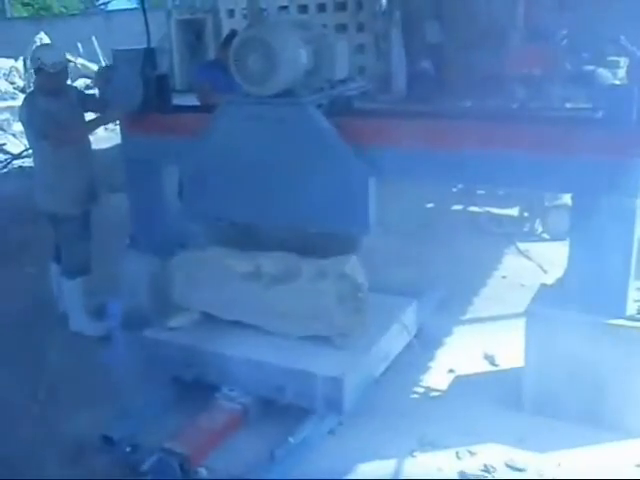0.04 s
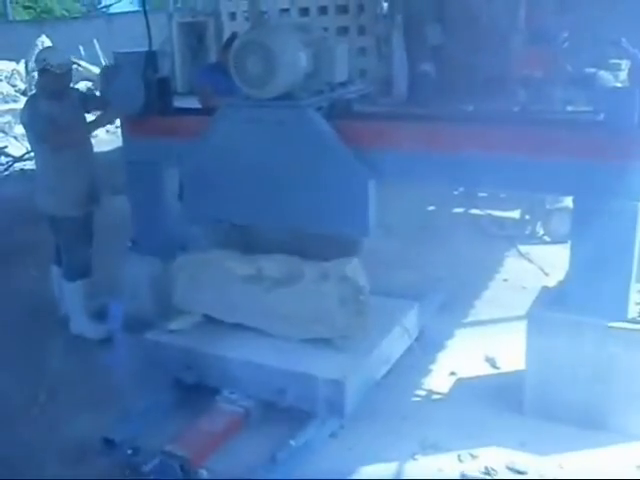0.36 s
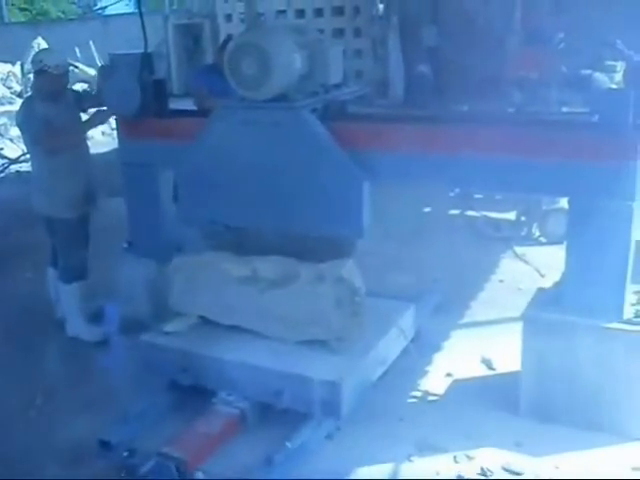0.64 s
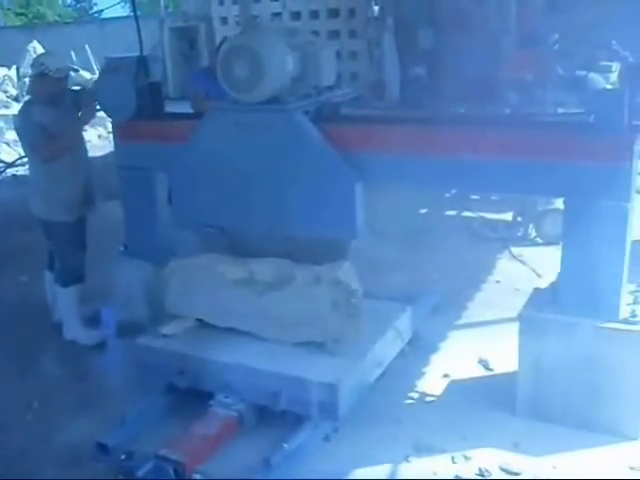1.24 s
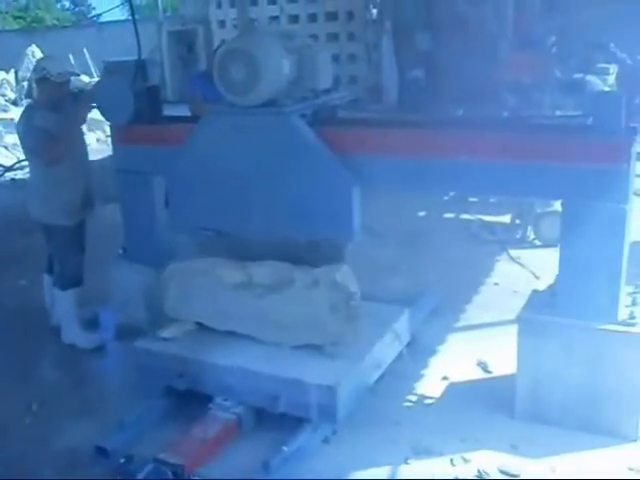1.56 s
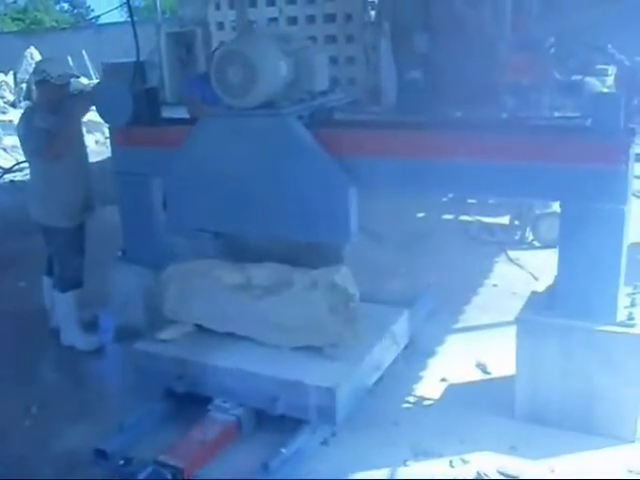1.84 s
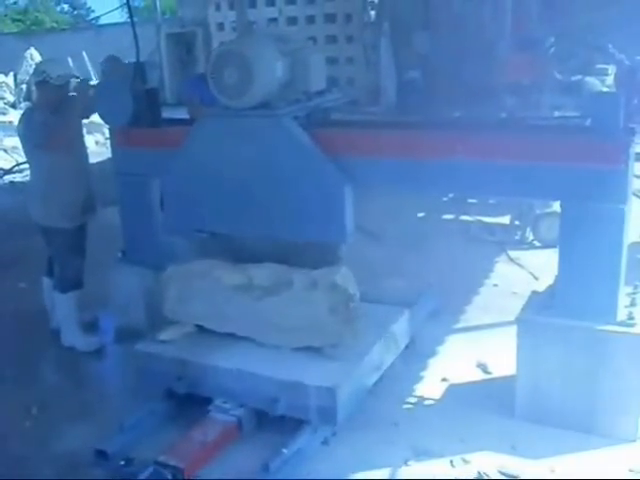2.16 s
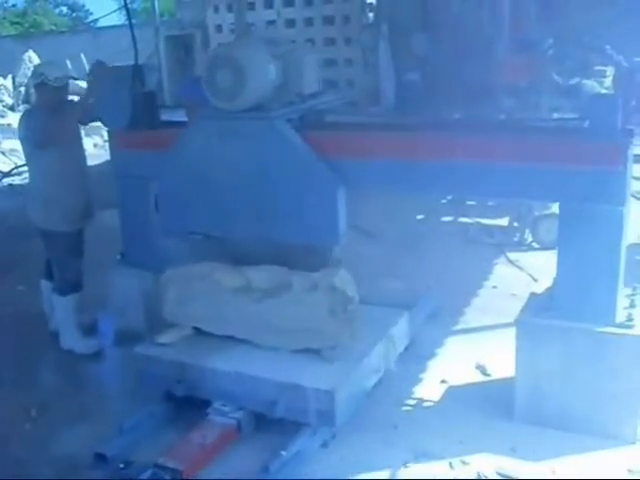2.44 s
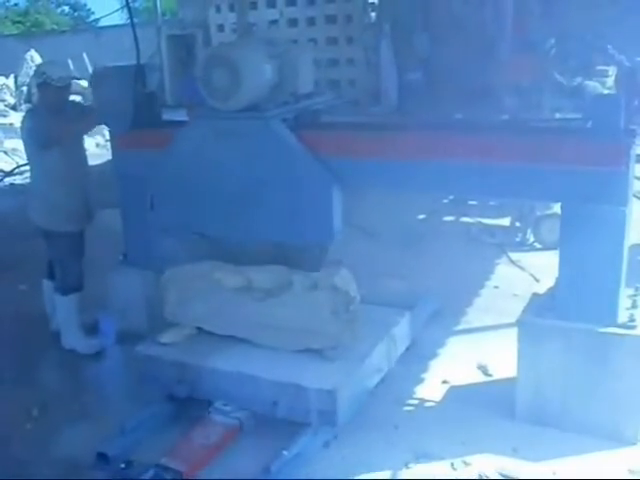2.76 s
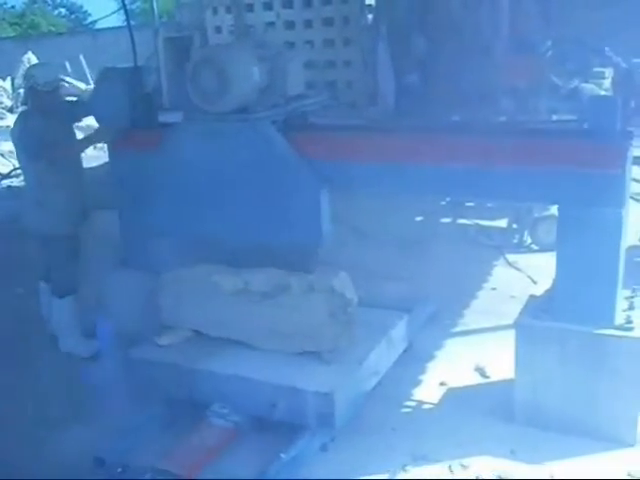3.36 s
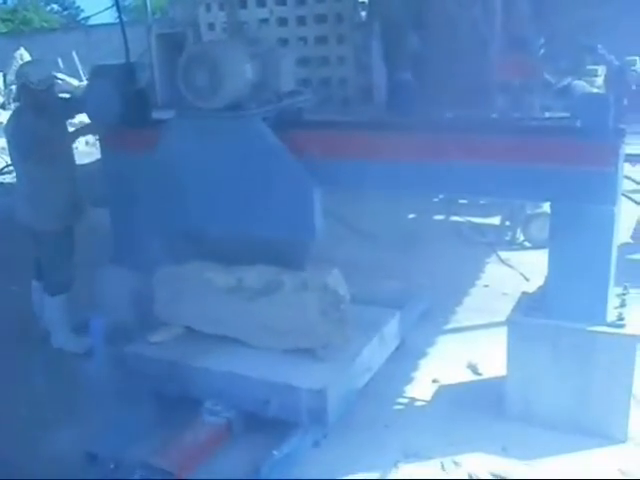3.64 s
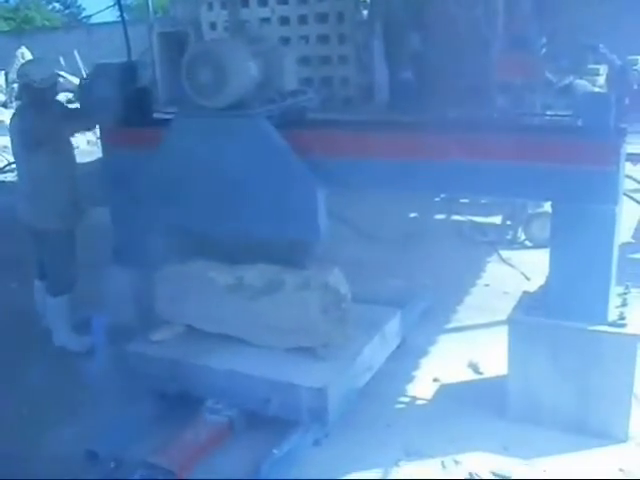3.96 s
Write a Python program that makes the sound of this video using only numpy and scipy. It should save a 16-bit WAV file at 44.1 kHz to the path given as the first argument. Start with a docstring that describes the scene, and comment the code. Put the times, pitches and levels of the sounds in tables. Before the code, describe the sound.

A big motor-driven saw cuts stone, roaring and hissing harshly, then easing off.

```python
"""A big motor-driven disc saw grinds through a stone block in a workshop, heard in mono.
It opens mid-cut: the rim meets the stone the same way on every turn, so rumble and roar throb about
17 times a second, while grit hisses and crackles and rings the steel disc. Now and then the teeth
snag and the disc sings on one mode. The bite eases towards 2.5 s, digs in hard once more at 2.8 s
and lets go by 4 s."""
import sys
import numpy as np
from scipy.fft import rfft, irfft, next_fast_len
from scipy.io import wavfile
from scipy.ndimage import map_coordinates

SR = 44100
rng = np.random.default_rng(int(sys.argv[2]) if len(sys.argv) > 2 else 0)


def to_wav(s):
    """Save 16-bit WAV."""
    ch = np.atleast_2d(s).T  # columns
    pcm = np.round(np.clip(ch, -1, 1) * 32767)  # PCM
    wavfile.write(sys.argv[1], SR, pcm.astype(np.int16))


N = 176400

# disc speed, higher when the cut is light (time [s], speed [turns/s])
DISC_SPEED = [(0, 16.9), (1.2, 16.93), (1.75, 17.17), (2.6, 17.2), (2.85, 17.0), (3.2, 17.15), (4, 17.25)]
# whine of the drive (multiple of the turning rate, level [dB])
DRIVE_TONES = [(14, -52), (23, -54.5), (36, -49), (40, -49.5)]

# Fader rides, ahead of each layer's trim (time [s], level [dB])
THUD_FADER = [(0, -40), (.5, -42), (1.3, -44), (1.8, -51), (2.15, -61), (4, -69)]  # low thud of the frame
RUMBLE_FADER = [(0, -34), (1.2, -36), (1.8, -38.5), (2.0, -42.5), (2.25, -41.5), (2.55, -46.5),
                (2.73, -40.5), (2.92, -44.5), (3.26, -41), (4, -54.5)]  # rumble of the frame
ROAR_FADER = [(0.0, -19), (0.05, -18), (0.09, -21), (1.2, -20.5), (1.88, -25), (1.89, -20), (1.94, -25),
              (2.28, -23.5), (2.65, -25), (2.71, -21.5), (3.13, -24.5), (3.2, -22.5), (3.89, -28),
              (4.0, -28)]  # rim dragging in the slot
BITE_FADER = [(0.0, -16.5), (0.32, -16.5), (0.63, -19), (1.11, -18), (1.49, -19), (1.53, -17),
              (1.87, -21.5), (1.89, -21), (1.99, -23.5), (2.25, -18), (2.47, -26), (2.51, -21.5),
              (2.61, -22.5), (2.76, -14.5), (2.82, -17.5), (3.58, -25.5), (3.94, -40), (4.0, -45)]  # how hard the rim bites
RASP_FADER = [(0.0, -19), (0.59, -26.5), (1.05, -23.5), (1.7, -27), (1.86, -29.5), (1.89, -22.5),
              (2.04, -40), (2.1, -25.5), (2.6, -29.5), (2.81, -17), (3.13, -27.5), (3.23, -23.5),
              (3.38, -30.5), (3.58, -30.5), (3.94, -51), (4.0, -46)]  # upper grinding band
HISS_FADER = [(0.0, -27), (0.7, -29), (1.12, -28.5), (1.67, -29.5), (1.74, -33), (1.93, -32), (2.04, -41),
              (2.13, -32), (2.6, -31), (2.8, -21), (3.02, -26), (3.07, -31), (3.52, -32), (3.85, -46),
              (4.0, -54)]  # treble hiss of the grit
GUARD_FADER = [(0, -35), (1.3, -36.5), (1.6, -39), (1.77, -37), (1.95, -44), (2.2, -43), (2.5, -48),
               (2.85, -41.5), (3.05, -46), (3.35, -44.5), (3.7, -51), (4, -50)]  # ring of the guard

# EQ curves (frequency [Hz], relative level [dB])
ROOM_EQ = [(20, -27), (50, -3), (120, 6), (400, -8), (2000, -30)]  # dull room tone
THUD_EQ = [(20, -47), (50, -25), (100, -10), (135, -18.5), (152, 0), (205, 5), (240, -24), (300, -18),
           (800, -70)]  # bass of the frame
RUMBLE_EQ = [(60, -47), (200, -23), (255, -0.5), (340, -2.5), (430, 0), (620, 1), (900, -10), (2000, -80)]  # low mids of the frame
ROAR_EQ = [(30, -55), (200, -39), (450, -14.5), (620, -7), (740, -9.5), (820, 1.5), (980, -1), (1200, -1),
           (1400, 2.5), (1700, -1), (2200, -3), (3000, -18), (6000, -20.5), (15000, -30)]  # midrange of the slot
GRIND_EQ = [(300, -62), (1100, -24), (1800, -2.5), (2300, 1), (2750, -2.5), (3200, 0), (3400, -5),
            (4400, -12), (6500, -35), (15000, -44)]  # harsh upper mids of the teeth
RASP_EQ = [(2500, -31.5), (3750, 0), (4700, 0), (5800, 2), (6300, 3.5), (6480, -8), (10000, -22)]  # their bright edge
HISS_EQ = [(1500, -26), (4500, -13), (7200, 3), (8700, 2), (10100, 1), (10600, -8.5), (11400, -7),
           (12100, 2.5), (13400, 1), (15400, 0.5)]  # airy top of the grit
GRIT_EQ = [(500, -20), (2000, -1), (6000, -8), (11000, -10), (15000, -14)]  # tiny cracks
SNAG_EQ = [(500, -36), (1300, -5), (2200, -1.5), (3150, 10.5), (3500, -1), (4200, -9), (6200, -4),
           (7000, -17), (15000, -24)]  # teeth on harder stone

# modes of the steel disc (frequency [Hz], relative level [dB])
DISC_MODES = [(882.9, -38), (936.7, -35.5), (1136, -34.5), (1357, -33), (1405, -32), (1841, -31.5),
              (2040, -34.5), (2541, -38), (2961, -35), (3122, -36), (3569, -35.5), (3817, -40.5),
              (4344, -42.5), (4662, -48.5), (4867, -41), (4942, -53), (5044, -54.5), (5114, -41.5),
              (5346, -41.5), (5561, -55.5), (5749, -39.5), (5916, -56.5), (6288, -54), (6993, -44.5),
              (7090, -51.5), (7364, -66), (7553, -53), (8043, -65.5), (8301, -80), (8613, -43.5)]
# the guard's ring after each knock (frequency [Hz], relative level [dB], 60 dB decay time [s])
GUARD_MODES = [(233.9, 0.5, 0.15)]
# the teeth snag on harder stone (peak time [s], length [s], level [dB])
SNAG_SWELLS = [(.04, .07, -23), (.31, .08, -24), (1.548, .04, -19.5), (1.905, .025, -23), (2.82, .15, -22),
               (3.24, .08, -25)]
# the disc sings on one mode (peak time [s], length [s], frequency [Hz], level [dB])
SING_SWELLS = [(0.245, 0.53, 968, -25.5), (0.547, 0.27, 1404, -27), (.7, 0.9, 845, -33),
               (.55, 0.69, 1170, -32), (1.1, 0.37, 884, -28.5), (1.303, 1, 605.5, -35.5),
               (1.45, 0.15, 3572, -28), (1.68, .13, 2025, -22), (2.377, .3, 951, -27.5),
               (2.803, 0.83, 780, -34), (3.29, 0.42, 942, -27), (3.248, 0.078, 1418, -25),
               (3.65, .35, 1450, -31)]

THUD_DB, ROAR_DB, RING_DB, KNOCK_DB, ROOM_DB = -1.5, 0.5, -7, -4, -63  # trims
GRIND_DB, RASP_DB, HISS_DB, GRIT_DB = -3, -2.5, 2.5, -12.5  # trims of the grinding
FIRST_THROB_S, FIRST_KNOCK_S = 0.046, 0.02632


def amp(db):
    """Decibels to gain."""
    return 10 ** (np.asarray(db) / 20)


def unit(x):
    """Scaled to rms 1."""
    return x / np.sqrt(np.mean(x ** 2) + 1e-20)


def curve(rows):
    """(time, value) points to one value per sample."""
    return np.interp(np.arange(N) / SR, *np.transpose(rows))


def wobble(rate):
    """A smooth random modulator, rate knots a second."""
    return map_coordinates(rng.standard_normal(int(N * rate / SR) + 4), [np.arange(N) * rate / SR])


def filtered(x, response):
    """x through a frequency response."""
    size = next_fast_len(N + SR // 2)
    return irfft(rfft(x, size) * response(np.fft.rfftfreq(size, 1 / SR)), size)[:N]


def coloured(x, eq):
    """x through an EQ curve, at rms 1."""
    freqs, db = np.transpose(eq)
    return unit(filtered(x, lambda hz: amp(np.interp(np.log(hz + 1), np.log(freqs + 1), db))))


def rub(turns, repeat, size=4096):
    """Rubbing force: the rim's profile loops each turn (power share repeat) over fresh stone noise."""
    bins = np.arange(size // 2 + 1)
    profile = unit(irfft(np.exp(2j * np.pi * rng.random(len(bins))) * (bins < size // 4)))
    rim = map_coordinates(profile, [turns % 1 * size], mode="grid-wrap")
    return np.sqrt(repeat) * rim + np.sqrt(1 - repeat) * rng.standard_normal(N)


def throb(turns, depth_db):
    """Gain that swells once a turn, as the disc runs slightly out of true."""
    return unit(amp(depth_db * np.cos(2 * np.pi * (turns - FIRST_THROB_S * DISC_SPEED[0][1]))))


def crowded_modes(x, depth_db, spacing_hz):
    """The disc's countless weak modes: narrow peaks and dips at random frequencies."""
    knots = np.sqrt(3) * rng.uniform(-1, 1, 4096)
    return filtered(x, lambda hz: amp(depth_db * map_coordinates(knots, [hz / spacing_hz], mode="wrap")))


def workshop():
    """A steady bed of low room tone."""
    return amp(ROOM_DB) * coloured(rng.standard_normal(N), ROOM_EQ)


def drive(turns):
    """The drive whines in thin wavering tones locked to the shaft."""
    whine = np.zeros(N)
    for multiple, db in DRIVE_TONES:
        gain = np.sqrt(2) * amp(db + 1.75 * wobble(2.62))
        whine += gain * np.sin(2 * np.pi * multiple * turns + 0.76 * wobble(7.3))
    return whine


def rumble(turns):
    """The frame shakes under the rubbing: a low thud with each turn and a steadier rumble above it."""
    force = rub(turns, repeat=0.84)
    thud = amp(THUD_DB + curve(THUD_FADER)) * throb(turns, depth_db=3) * coloured(force, THUD_EQ)
    body = amp(curve(RUMBLE_FADER)) * throb(turns, depth_db=1.3) * coloured(force, RUMBLE_EQ)
    return thud + body


def roar(turns):
    """The rim drags through the slot with a midrange roar."""
    drag = coloured(rub(turns, repeat=0.27), ROAR_EQ)
    return amp(ROAR_DB + curve(ROAR_FADER)) * throb(turns, depth_db=0.43) * drag


def grit(cracks_per_s=1800, spread_db=2.5):
    """Grit breaks away in a dense crackle of tiny clicks."""
    clicks = (rng.random(N) < cracks_per_s / SR) * rng.choice([-1, 1], N)
    strength = amp(spread_db * np.minimum(rng.exponential(size=N), 5))
    return coloured(clicks * strength, GRIT_EQ)


def grinding(turns):
    """The teeth tear off grit: a harsh band with crackle, and a rasp and a hiss above it."""
    harsh = coloured(crowded_modes(rub(turns, repeat=0.26), depth_db=2.26, spacing_hz=26.4), GRIND_EQ)
    rasp = coloured(crowded_modes(rub(turns, repeat=0.17), depth_db=5.0, spacing_hz=15), RASP_EQ)
    hiss = coloured(crowded_modes(rng.standard_normal(N), depth_db=3.5, spacing_hz=20), HISS_EQ)
    bite = amp(curve(BITE_FADER)) * (amp(GRIND_DB) * harsh + amp(GRIT_DB) * grit())
    edge = amp(RASP_DB + curve(RASP_FADER)) * rasp
    air = amp(HISS_DB + curve(HISS_FADER)) * hiss
    flicker = amp(0.41 * wobble(25.9) + 0.32 * wobble(150))
    return flicker * ((bite + edge) * throb(turns, depth_db=1) + air * throb(turns, depth_db=0.5))


def ringing(split_hz=1550, width_hz=8.7):
    """Rubbing keeps the disc's strong modes ringing: low ones ride the roar, high ones the bite."""
    def resonate(modes):
        def response(f):
            damping = 1j * f * width_hz
            return sum(rng.choice([-1, 1]) * amp(db) * damping / (hz * hz - f * f + damping)
                       for hz, db in modes)
        return unit(filtered(rng.standard_normal(N), response))
    low = resonate([(hz, db) for hz, db in DISC_MODES if hz < split_hz])
    high = resonate([(hz, db) for hz, db in DISC_MODES if hz >= split_hz])
    return amp(RING_DB) * (amp(curve(ROAR_FADER)) * low + amp(curve(BITE_FADER)) * high)


def knocks(turns, attack_s=0.022, spread_db=2):
    """Once a turn the high spot of the rim knocks on the stone and rings the guard."""
    count = turns - FIRST_KNOCK_S * DISC_SPEED[0][1] + 1
    strength = amp(spread_db * rng.standard_normal(int(count[-1]) + 2))
    out = np.zeros(N)
    for back in range(2):  # the latest knock and the tail of the one before
        age = (count % 1 + back) / curve(DISC_SPEED)
        ring = sum(amp(db - 60 * age / t60) * np.sin(2 * np.pi * hz * age) for hz, db, t60 in GUARD_MODES)
        attack = 1 - np.exp(-age / attack_s)
        out += strength[count.astype(int) - back] * attack * ring
    return amp(KNOCK_DB + curve(GUARD_FADER)) * unit(out)


def swell(peak_s, length_s):
    """A bell-shaped fade in and out."""
    return np.exp(-2 * ((np.arange(N) / SR - peak_s) / length_s) ** 2)


def snags():
    """Short flares of grinding where the stone is harder."""
    flares = sum(amp(db) * swell(peak_s, length_s) for peak_s, length_s, db in SNAG_SWELLS)
    return flares * coloured(rng.standard_normal(N), SNAG_EQ)


def singing(waver_hz=5.5):
    """One mode swells for a moment where the disc's flank rubs the slot."""
    out = np.zeros(N)
    for peak_s, length_s, hz, db in SING_SWELLS:
        phase = 2 * np.pi * np.cumsum(hz + waver_hz * wobble(60)) / SR
        out += amp(db + 0.67 * wobble(29.82)) * swell(peak_s, length_s) * np.sin(phase)
    return out


def scene():
    """Machine and cut share one turning shaft, mixed in mono over the room tone."""
    turns = np.cumsum(curve(DISC_SPEED)) / SR
    machine = drive(turns) + knocks(turns) + rumble(turns)
    cut = roar(turns) + grinding(turns) + snags() + ringing() + singing()
    mono = machine + cut + workshop()
    return np.array([mono, mono])


def record(dry):
    """A brick-wall low-pass takes off the very top."""
    return np.array([filtered(channel, lambda hz: hz < 15500) for channel in dry])


dry = scene()
out = record(dry)
to_wav(out)
```